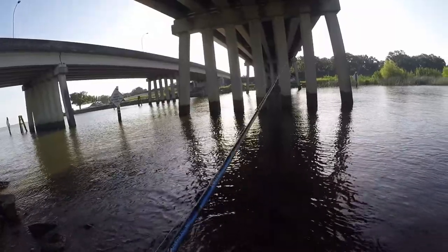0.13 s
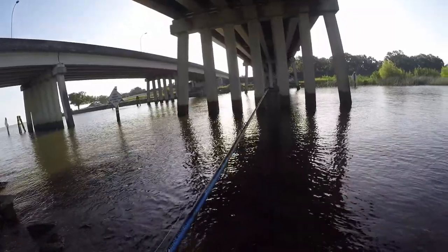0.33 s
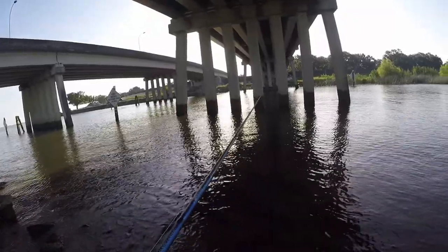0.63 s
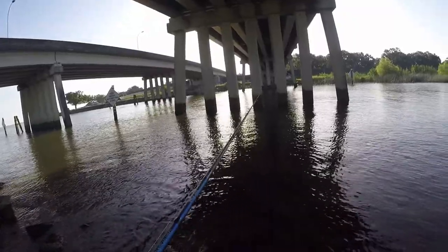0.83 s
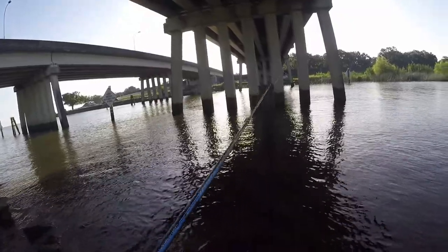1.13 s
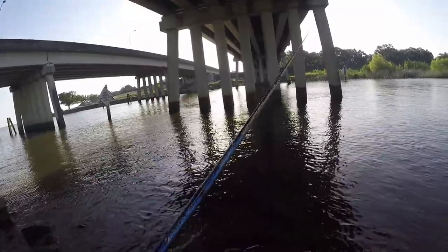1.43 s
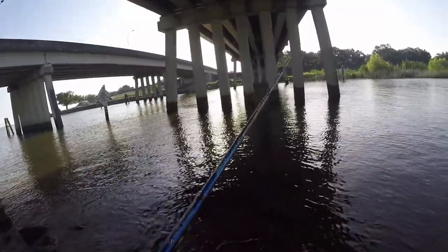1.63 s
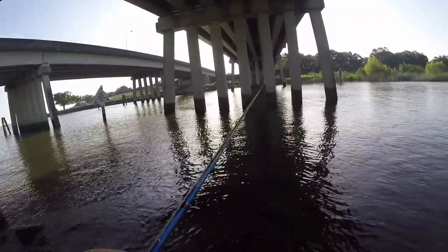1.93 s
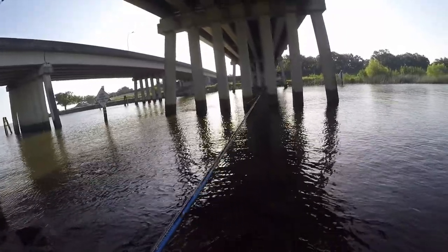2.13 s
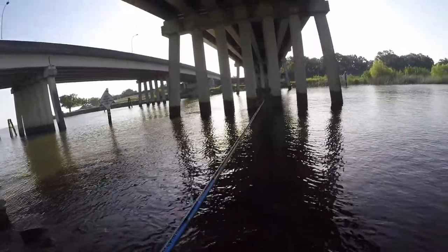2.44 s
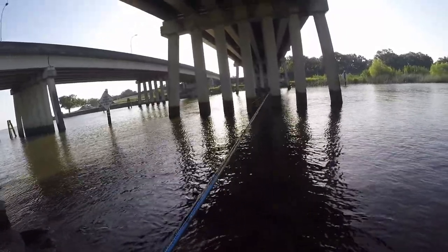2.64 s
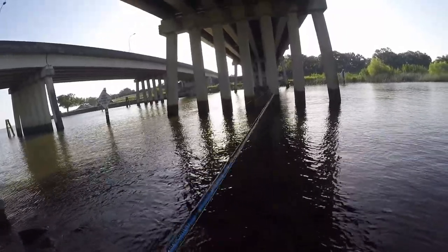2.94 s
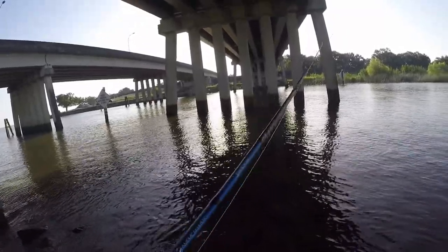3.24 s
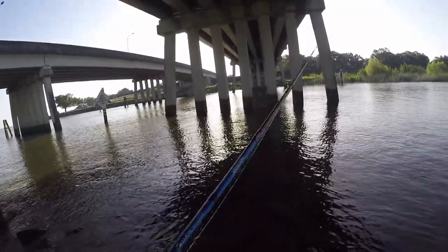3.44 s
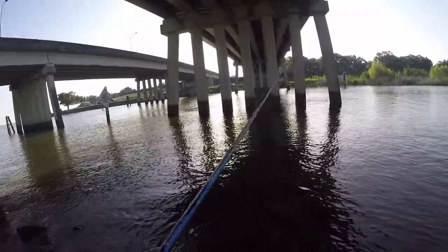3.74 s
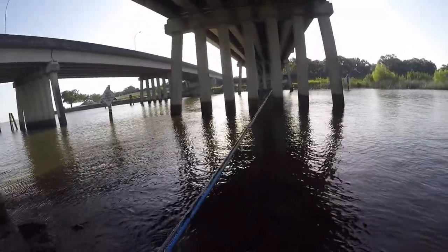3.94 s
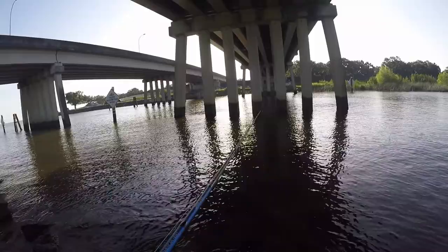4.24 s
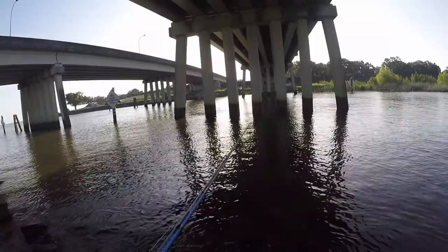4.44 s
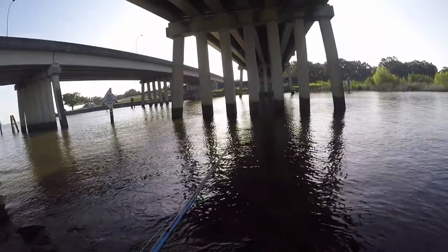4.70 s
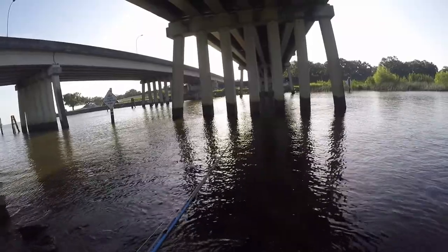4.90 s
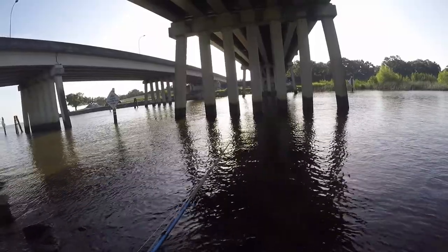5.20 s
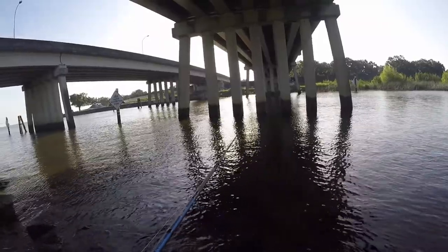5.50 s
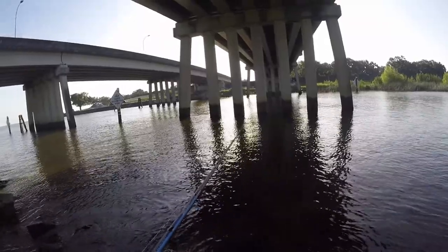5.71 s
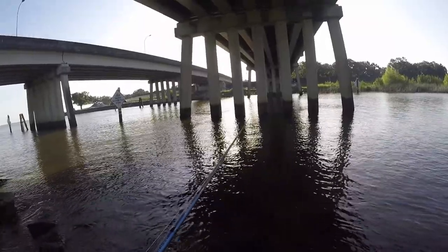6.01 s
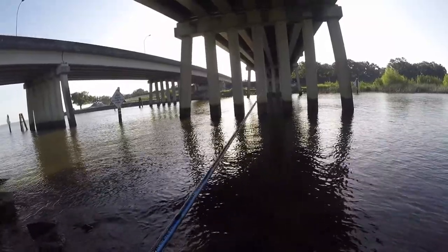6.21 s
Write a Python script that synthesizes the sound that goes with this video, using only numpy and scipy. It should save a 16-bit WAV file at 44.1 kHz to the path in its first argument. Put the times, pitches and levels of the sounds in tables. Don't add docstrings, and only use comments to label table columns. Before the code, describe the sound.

Under a concrete bridge, deep traffic rumble drones overhead while wind buffets the microphone and small drops plip and bubble at the water's edge.

```python
import sys
import numpy as np
from scipy import signal
from scipy.fft import rfft, irfft
from scipy.io import wavfile
from scipy.ndimage import uniform_filter1d

SR = 44100
rng = np.random.default_rng(int(sys.argv[2]) if len(sys.argv) > 2 else 0)


def to_wav(sig):
    pcm = np.clip(np.atleast_2d(sig), -1, 1) * 32767
    pcm = np.round(pcm).astype(np.int16)
    wavfile.write(sys.argv[1], SR, pcm.T)


def rack_gain(trim_db):
    fader = np.asarray(trim_db, float)
    return 10 ** (fader / 20)


N = 280476


def evened(x):
    return x / np.sqrt(np.mean(x ** 2) + 1e-20)


def smooth_noise(count, *sizes):
    x = rng.standard_normal(count)
    for size in sizes:
        x = uniform_filter1d(x, size=size)
    return evened(x)


def along(rows, t):
    s, *columns = np.transpose(rows)
    return [np.interp(t, s, c) for c in columns]


def across(rows, hz):
    f, *columns = np.transpose(rows)
    return [np.interp(np.log(hz + 1), np.log(f + 1), c) for c in columns]


def add(mix, s, sound):
    part = mix[:, round(s * SR):][:, :sound.shape[1]]
    part += sound[:, :part.shape[1]]


def colour(x, rows):
    gain_db = across(rows, np.fft.rfftfreq(N, 1 / SR))[0]
    return irfft(rfft(x) * rack_gain(gain_db), N)


def patchy(patch_db, flicker_db):
    frames = N // 128 + 5
    a, b, c, d, patches = rng.standard_normal((frames, 257, 5)).T
    patches = uniform_filter1d(patches, size=6, axis=0)
    patches = evened(uniform_filter1d(patches, size=24, axis=1))
    flicker = smooth_noise(frames, 8)
    z = np.array([a + 1j * b, c + 1j * d]) * rack_gain(patch_db * patches + flicker_db * flicker)
    return evened(signal.istft(z, nperseg=512, noverlap=384)[1][:, :N])


def ringing(modes):
    f = np.fft.rfftfreq(N, 1 / SR)
    power = np.zeros(len(f))
    for hz, width, db in modes:
        power += rack_gain(db) ** 2 / width / (1 + (2 * (f - hz) / width) ** 2) ** 2
    return irfft(rfft(rng.standard_normal((2, N))) * np.sqrt(power * 2 * SR / np.pi), N)


def drones(rows):
    out = np.zeros(N)
    for hz, db, wander_hz in rows:
        drift = smooth_noise(N, 9000, 9000)
        swell = smooth_noise(N, 9000, 9000)
        turns = np.cumsum(hz + wander_hz * drift) / SR
        out += rack_gain(db + 1.5 + 0.5 * swell) * np.sin(2 * np.pi * turns + 6.45 * rng.random())
    return out


def swells(t, times, rise, fall):
    u = t[::100] - np.array(times)[:, None]
    return np.where(u < 0, np.exp(-(u / rise) ** 2), np.exp(-abs(u) / fall))


def wind(t):
    # start in seconds, peak level in dB, left minus right in dB.
    gusts = [(0.03, -15.5, 12.5), (0.17, -15, 14), (0.41, -17, -8), (0.54, -17.5, -12), (0.67, -17.5, 11),
             (0.8, -11, 5.5), (1.03, -17.5, 17), (1.22, -20, 21), (1.33, -18.5, 16.5), (1.43, -24, 18),
             (1.66, -16.5, 7), (1.75, -20.5, 12), (2.05, -13, 8.5), (2.2, -36, 5), (2.55, -18, -2),
             (2.8, -29, 5), (3.17, -15, 10), (3.4, -23.5, 16.5), (3.65, -19.5, 10.5), (3.93, -23.5, 13),
             (4.12, -32, 11), (4.41, -26, 21), (4.8, -30.5, 12), (4.99, -18.5, 5), (5.17, -16.5, 8),
             (5.33, -20.5, 10), (5.77, -21.5, 8), (5.9, -29, 0), (6.05, -40, 11.5), (6.35, -35, 8)]
    # frequency in Hz, level in dB per Hz.
    gust_colour = [(5, -12), (12, 0.5), (22, -2), (45, -5), (75, -11.5), (120, -25.5), (200, -23.5),
                   (400, -55), (2000, -130)]
    lull_db = -30.5
    s, peak_db, lean_db = np.transpose(gusts)
    side_db = 2 * peak_db + np.array([lean_db, -lean_db])
    power = rack_gain(side_db) @ swells(t, s, rise=0.052, fall=0.069) + rack_gain(2 * lull_db)
    strength = np.array([np.interp(t, t[::100], np.sqrt(p)) for p in power])
    lumps = evened(colour(rng.standard_normal((2, N)), gust_colour))
    lumps[1] = 0.42 * lumps[0] + 0.95 * lumps[1]
    local = np.sqrt(uniform_filter1d(lumps ** 2, size=6000, axis=1)) + 0.32
    return lumps / local * strength * rack_gain(2.0)


def traffic(t):
    # time in seconds, load on the deck in dB.
    deck_load = [(0.0, -24.5), (0.44, -24), (1.01, -24.5), (1.88, -25), (2.73, -22.5), (3.65, -25.5),
                 (4.25, -25), (5.53, -23.5), (6.36, -23.5)]
    # frequency in Hz, level in dB per Hz.
    rumble_colour = [(30, -16.5), (60, -8), (100, 1.5), (145, -7), (200, -5.5), (290, -10.5), (335, -14),
                     (400, -14.5), (520, -25), (900, -62), (3000, -110)]
    # frequency in Hz, level in dB per Hz.
    roar_colour = [(240, -25.5), (420, -1), (600, -5.5), (800, -10.5), (1200, -13.5), (1600, -19.5),
                   (2100, -22), (2600, -21), (3600, -26.5), (6200, -31.5), (7800, -37.5), (10300, -32),
                   (11000, -52), (15000, -55)]
    # pitch in Hz, width in Hz, level in dB against the rumble.
    girders = [(79, 9.1, -12.5), (111.05, 6.1, -8), (121.7, 16.6, -9.5), (171.7, 18, -14.5),
               (205.6, 5.4, -15), (227.5, 11, -17), (279, 20, -15), (307.4, 62, -13), (356.8, 20, -14.5)]
    # pitch in Hz, level in dB against the rumble, wander in Hz.
    steady_engines = [(170.8, -6, 1.2), (106.5, -10, 2.5)]
    rumble_db = along(deck_load, t)[0]
    roar_db = -40.5 + 0.71 * np.maximum(t - 2.76, 0)
    deck = evened(colour(rng.standard_normal((2, N)), rumble_colour)) * rack_gain(-1.5)
    deck = deck + ringing(girders) + drones(steady_engines) + engines(t)
    roar = evened(colour(patchy(patch_db=1.13, flicker_db=1.0), roar_colour))
    own, other = rack_gain(rumble_db - 1.03) * deck + rack_gain(roar_db + 2) * roar
    return ports(own, other)


def engines(t):
    # time in seconds, third-order pitch in Hz, level in dB against the rumble.
    idling = [(0.0, 226.6, -12), (0.14, 225.5, -9.5), (0.3, 231.3, -8.5), (0.55, 229.3, -8.5),
              (2.16, 231.0, -7.5), (2.78, 227.2, -7.5), (2.87, 230.5, -10), (3.45, 229.5, -8),
              (3.88, 235.5, -8), (4.89, 234.6, -6.5), (5.01, 229.9, -8.5), (6.36, 230.3, -7.5)]
    # time in seconds, exhaust note in Hz, level in dB against the rumble.
    shifting = [
        (1.6, 299, -28),
        (2.3, 300, -13),
        (2.85, 299, -6.5),
        (3.15, 287.4, -8),
        (3.45, 272, -10.5),
        (3.7, 267, -10),
        (3.95, 277.6, -5.5),
        (4.25, 284, -9),
        (4.6, 294, -30),
    ]

    def tone(hz):
        return np.sin(2 * np.pi * (np.cumsum(hz) / SR + rng.random()))
    third_hz, idler_db = along(idling, t)
    note_hz, note_db = along(shifting, t)
    idler = tone(third_hz) + rack_gain(-0.44) * tone(third_hz * 4 / 3)
    return rack_gain(1.0) * (rack_gain(idler_db) * idler + rack_gain(note_db) * tone(note_hz))


def ports(own, other):
    # frequency in Hz, likeness from 0 to 1, left minus right in dB, left's lead in radians.
    port_pair = [(60, .62, 4.6, 0), (130, .92, 4, 0), (500, .97, 3.9, 0), (1100, .86, 3.4, 0),
                 (1600, .62, 3, 0), (2200, .3, 1.2, 0), (2700, .35, .2, .2), (3600, .2, -.1, 2),
                 (5700, .25, -2.5, 3.4), (7500, .22, -2.7, 5.3), (10000, .1, -4, 7), (14000, .15, -1, 9)]
    same, lean_db, lead = across(port_pair, np.fft.rfftfreq(N, 1 / SR))
    same = np.clip(same, 0, 1)
    left = rfft(own)
    right = same * left * np.exp(-1j * lead) + np.sqrt(1 - same ** 2) * rfft(other)
    return irfft(np.array([left * rack_gain(lean_db / 2), right * rack_gain(-lean_db / 2)]), N)


def whine(t):
    # time in seconds, level in dB.
    whine_level = [(0.0, -47), (0.78, -46.5), (1.35, -46), (1.75, -50), (2.09, -47), (3.12, -46),
                   (3.52, -53.5), (4.27, -58), (4.52, -49.5), (5.99, -48), (6.36, -53)]
    # pitch in Hz, level in dB.
    whine_tones = [(1026, -8), (1097, -1), (1125, -1.5), (1139, -0.5)]
    tones = drones([(hz, db, 1.2) for hz, db in whine_tones])
    return rack_gain(along(whine_level, t)[0] - 5.0) * tones * rack_gain(np.array([[1.6], [-1.6]]))


def insects(t):
    # time in seconds, level of the high insects in dB.
    chorus_level = [(0.0, -54.5), (0.05, -57.5), (2.71, -56.5), (2.8, -54.5), (3.68, -59), (3.79, -57),
                    (6.22, -59), (6.32, -58), (6.36, -60)]
    # pitch in Hz, width in Hz, level in dB.
    high_wings = [(9795, 390, 0), (9510, 60, -10), (9270, 550, -3), (10400, 490, -13.5)]
    high = singer(t, 69.3, 0.16, high_wings, arch_hz=330.)
    low = singer(t, 56., 0.44, [(6860, 250, 0)], arch_hz=60.)
    high_db = along(chorus_level, t)[0] + np.array([[-2.5], [4.5]])
    return high * rack_gain(high_db) + low * rack_gain(np.array([[-69.], [-66.]]))


def singer(t, strokes_hz, depth, wings, arch_hz):
    beat = 2 * np.pi * strokes_hz * t + 1.5 * smooth_noise(N, 20000, 8000)
    ring = ringing(wings)
    ring[0] += 0.27 * ring[1]
    flutter = smooth_noise(N, 150)
    pitch = wings[0][0] + arch_hz * (np.cos(beat) - 1) + 60. * flutter
    stroke = 0.6 * (1 + np.cos(beat)) * np.sin(2 * np.pi * np.cumsum(pitch) / SR)
    hiss = ring / ring.std(axis=1, keepdims=True) * (1 + depth * np.cos(beat))
    return rack_gain(-0.5) * (hiss + stroke)


def trickle(t):
    # time in seconds, level of the fine trickle in dB.
    trickle_level = [(0.0, -57.5), (0.83, -57.5), (1.43, -57.5), (1.66, -58.5), (2.96, -59.5),
                     (3.31, -59.5), (4.39, -56.5), (4.53, -56), (5.95, -55.5), (6.24, -56.5), (6.36, -54)]
    level_db = along(trickle_level, t)[0]
    busy_db = level_db - level_db.mean()
    pops_now = rng.random(N) < 800. / SR * rack_gain(1.5 * busy_db)
    size = rack_gain(2.0 * np.minimum(rng.exponential(1, N), 3.5)) * pops_now
    kind = rng.integers(0, 16, N)
    side = rng.random(N) < .5
    out = np.zeros((2, N))
    for k, hz in enumerate(np.geomspace(900., 8000., num=16)):
        u = np.arange(400) / SR * hz
        fade = np.exp(-u / 2.3) * np.minimum(u, 1)
        grain = np.sin(2 * np.pi * u * (1 + 0.018 * u)) * fade * (hz / 3000) ** -.95
        hits = size * (kind == k) * np.array([side, ~side])
        out += signal.oaconvolve(hits, grain[None], axes=1)[:, :N]
    return evened(out + 0.39 * out[::-1]) * rack_gain(level_db + 1.5 * busy_db + 3.0)


def spray(t):
    # frequency in Hz, level in dB per Hz.
    spray_colour = [(3000, -33), (7000, -10), (10500, 0), (13000, -3), (15000, -8.5), (17000, -20)]
    mist_db = -92
    strength = np.sqrt(splash_power(t) + rack_gain(2 * mist_db))
    return strength * rack_gain(8.0) * evened(colour(patchy(patch_db=3.5, flicker_db=2.0), spray_colour))


def splash_power(t):
    # time in seconds, peak level in dB.
    splashes = [(0.1, -79), (0.41, -83), (0.55, -80), (0.92, -70.5), (0.96, -75.5), (1.7, -79),
                (2.2, -83.5), (2.55, -84), (3.1, -76), (3.45, -73.5), (3.63, -70.5), (3.72, -72.5),
                (3.98, -71.5), (4.32, -70), (4.45, -74), (4.64, -69.5), (4.75, -75), (4.86, -70),
                (5.06, -71), (5.15, -70.5), (5.3, -77), (5.51, -67.5), (5.6, -69), (5.7, -67.5),
                (5.87, -67.5), (5.95, -74.5), (6.04, -65.5), (6.15, -78.5), (6.28, -69)]
    s, peak_db = np.transpose(splashes)
    return np.interp(t, t[::100], rack_gain(2 * peak_db) @ swells(t, s, rise=.012, fall=.035))


def lapping(t):
    # start in seconds, peak in dB, ring in Hz, width in Hz.
    spits = [(0.403, -19, 6300, 1500), (0.6771, -29, 7260, 2020), (0.916, -30, 8000, 600),
             (0.9231, -22, 4840, 1000), (0.955, -20.5, 5640, 900), (0.9545, -24, 4300, 900),
             (0.9555, -24, 7800, 1500), (0.9759, -33, 4510, 1030), (3.458, -33, 7600, 390),
             (3.7138, -29.5, 8100, 840), (3.977, -30, 4800, 800), (4.3205, -18, 6750, 3980),
             (4.3385, -19, 6050, 2500), (4.3772, -33, 4920, 1120), (4.4327, -33, 5070, 550),
             (4.4692, -34, 5550, 1400), (4.7228, -33.5, 4580, 380), (4.8431, -26, 7510, 1590),
             (5.1457, -33, 7100, 1500), (5.1489, -31, 4430, 940), (5.3258, -35, 5480, 710),
             (5.495, -23.5, 4440, 500), (5.4955, -21, 6030, 2500), (5.6681, -30, 6030, 2460),
             (5.684, -28, 4320, 610), (5.8658, -25, 5130, 1800), (6.0305, -28, 8500, 1000),
             (6.0505, -27, 7200, 1680), (6.1389, -33, 4910, 1730), (6.2604, -30, 5770, 900),
             (5.523, -36, 5600, 2500), (5.531, -34, 5250, 500), (5.567, -33, 4100, 700),
             (5.601, -33, 6400, 900), (5.629, -31, 7200, 2000), (5.704, -36, 8300, 1200),
             (5.721, -37, 7800, 1500), (5.732, -38, 6300, 800), (5.879, -37, 8000, 900),
             (6.031, -33, 6000, 800), (6.096, -36, 4300, 1800), (6.274, -36, 5800, 900),
             (6.302, -36, 4100, 500), (5.931, -39, 5160, 500), (0.581, -40, 7200, 1200),
             (0.9275, -30, 6200, 900), (0.983, -40, 5000, 600), (3.828, -40, 5600, 900),
             (4.375, -31, 3500, 1500), (0.4035, -33, 4500, 700)]
    # start in seconds, peak in dB, ring in Hz, width in Hz.
    plips = [(0.123, -26, 700, 440), (0.2493, -30, 1710, 600), (0.581, -26, 3600, 700),
             (0.9155, -18, 1150, 600), (0.9238, -27, 1700, 700), (0.955, -23, 1500, 900),
             (0.956, -28, 2900, 1200), (0.97, -23, 1000, 500), (0.991, -29, 2160, 600),
             (1.023, -31, 2600, 500), (2.9485, -25.5, 1700, 900), (2.9835, -29, 2300, 700),
             (3.08, -26, 1450, 400), (3.6, -33, 2600, 500), (3.718, -25, 1700, 600),
             (3.806, -29, 2600, 300), (4.33, -34, 3840, 870), (4.337, -25, 2400, 960),
             (4.377, -22, 1200, 720), (4.4015, -20, 1000, 500), (4.612, -23, 1230, 240),
             (4.7, -34, 2200, 600), (5.363, -32, 2450, 500), (5.526, -32, 813, 300),
             (5.553, -28, 1940, 500), (5.5656, -28, 2000, 1500), (5.569, -28, 2600, 580),
             (5.612, -33, 2600, 500), (5.663, -26, 1610, 500), (5.704, -23, 2500, 1300),
             (5.7056, -22, 1300, 1300), (5.75, -30, 2560, 400), (5.772, -33, 3200, 500),
             (5.8655, -24, 3070, 450), (5.905, -28, 670, 300), (5.949, -26, 960, 300),
             (5.964, -30, 2400, 900), (6.067, -26, 3740, 460), (6.11, -27, 2370, 200),
             (6.15, -28, 783, 270), (6.16, -30.5, 2480, 350), (6.175, -26, 3160, 490),
             (6.245, -29, 1470, 400), (6.2599, -23, 2200, 1200), (6.3, -22, 3060, 900),
             (6.3, -19, 2020, 650), (6.345, -26, 1600, 500)]
    # start in seconds, peak in dB, ring in Hz,
    # width in Hz.
    more_plips = [(0.581, -32, 4600, 900), (1.684, -28, 800, 500), (2.949, -28, 2600, 1200),
                  (3.014, -27, 650, 400), (3.634, -34, 6500, 2500), (3.722, -28, 1900, 500),
                  (3.812, -29, 2400, 200), (4.3205, -27, 9200, 1500), (4.322, -29, 3250, 570),
                  (4.329, -29, 1800, 500), (4.392, -27, 1100, 600), (4.418, -30, 1750, 300),
                  (4.449, -38, 6300, 1200), (4.47, -32, 2600, 400), (4.473, -34, 4200, 500),
                  (4.566, -34, 3300, 500), (4.577, -37, 4800, 760), (4.633, -35, 7500, 1600),
                  (4.684, -31, 3100, 600), (5.327, -35, 6500, 1000), (5.5, -28, 1750, 800),
                  (5.523, -35, 3800, 1200), (5.565, -31, 4200, 700), (5.58, -33, 3000, 1500),
                  (5.592, -28, 830, 300), (5.657, -35, 4000, 1200), (5.716, -30, 2800, 900),
                  (5.732, -31, 2400, 900), (5.837, -37, 5000, 900), (5.866, -35, 7200, 1200),
                  (5.9, -36, 6500, 2500), (5.99, -34, 2000, 600), (6.031, -30, 2000, 1200),
                  (6.045, -34, 2700, 600), (6.073, -36, 7000, 2500), (6.097, -33, 3200, 1500),
                  (6.139, -34, 7500, 2000), (6.225, -33, 2200, 600), (6.26, -32, 3600, 1200),
                  (6.32, -37, 7500, 1800)]
    # start in seconds, peak in dB, ring in Hz, width in Hz.
    sloshes = [(0.925, -29, 1500, 900), (0.962, -31, 2300, 1600), (1.02, -33, 2500, 1400),
               (1.505, -35, 2300, 600), (1.54, -33, 2580, 1000), (2.99, -37, 2700, 700),
               (4.03, -35, 2500, 600), (4.325, -32, 2770, 1600), (4.375, -28, 1100, 900),
               (4.4, -28, 1300, 1200), (5.5, -37, 1800, 1200), (5.56, -29.5, 2300, 1500),
               (5.65, -32, 2190, 1200), (5.708, -28.5, 2580, 1200), (5.745, -38, 2600, 500),
               (5.93, -54, 2800, 1000), (6.06, -41, 2400, 1500), (6.2, -39, 2300, 1200),
               (6.27, -41, 6300, 1500)]
    # start in seconds, peak in dB, first pitch in Hz, fade by 60 dB in seconds, rise in octaves a second.
    bubbles = [(.281, -26, 970, 0.027, -6), (3.055, -27.5, 667, 0.064, 37), (3.856, -22.5, 1475, 0.025, -5),
               (4.874, -21.5, 492, 0.053, -6), (5.611, -26, 1316, 0.024, 31), (5.668, -21, 2540, 0.019, -9),
               (5.683, -28, 2180, 0.022, 15), (5.704, -13, 727, 0.021, 8), (5.919, -26.5, 1350, 0.028, 6),
               (6.006, -27, 920, 0.033, 1), (6.075, -28, 1140, .02, 3), (6.091, -22.5, 1310, 0.014, 5),
               (5.566, -24, 1150, 0.014, 4), (4.402, -18.5, 704, 0.012, 3), (6.03, -23, 1200, 0.061, 2),
               (6.188, -23.5, 600, 0.1, 18), (1.718, -26, 1050, 0.011, 2), (6.24, -25.5, 940, 0.036, 13.5)]
    out = gurgle(t)
    kinds = (spits, 0.0048, 0.98), (plips, 0.0037, 0.98), (more_plips, 0.0037, 0.98), (sloshes, 0.057, .3)
    for rows, t60, push in kinds:
        for s, *row in rows:
            add(out, s, tick(*row, t60, push))
    for s, *row in bubbles:
        add(out, s, bubble(*row))
    u = np.arange(6000) / SR
    echoes = rng.standard_normal((2, 6000)) * (rng.random((2, 6000)) < .2)
    echoes = echoes * rack_gain(-60 * u / 0.17) * (u > .003)
    return out + rack_gain(-15) * signal.oaconvolve(out, echoes / np.linalg.norm(echoes[0]), axes=1)[:, :N]


def gurgle(t):
    crowd = uniform_filter1d(splash_power(t), size=3000) / rack_gain(2 * -72.)
    rate = 120. * np.minimum(crowd, 1.5)
    starts = np.flatnonzero(rng.random(N) < rate / SR)
    out = np.zeros((2, N))
    for at, (loud, pitch, rise) in zip(starts, rng.random((len(starts), 3))):
        hz = 693.0 * 2 ** (2.6 * pitch)
        peak_db = -38. + 4.0 * loud - 3.7 * np.log2(hz / 1000)
        add(out, at / SR, bubble(peak_db, hz, 12. / hz, 22.0 * rise))
    return out


def bubble(peak_db, hz, t60, rise):
    u = np.arange(0, t60, 1 / SR)
    turns = np.cumsum(hz * 2 ** (rise * u)) / SR
    fade = rack_gain(-60 * (u / t60) ** 1.68) * np.minimum(u / 0.0018, 1)
    return rack_gain(peak_db - 3.0 + np.array([[1.7], [-1.7]])) * fade * np.sin(2 * np.pi * turns)


def tick(peak_db, hz, width, t60, push):
    noise = rng.standard_normal((3, 5000))
    u = np.arange(5000) / SR
    lean_db = 7.5 - 4 * np.log2(hz / 1000)
    spit = (noise[0] + 1.3 * noise[1:]) * rack_gain(-60 * u / (2.65 * t60)) * np.minimum(u / 0.0016, 1)
    strike = push * (np.arange(len(u)) == 40) + 0.2 * spit
    ring = resonate(resonate(strike, hz, 1.12 * width), hz, 5.1 * width)
    return rack_gain(peak_db - 4.0 + np.array([[lean_db], [-lean_db]]) / 2) * ring / abs(ring).max()


def resonate(x, hz, width):
    turn = np.exp(2j * np.pi * hz * np.arange(x.shape[-1]) / SR)
    r = np.exp(-np.pi * width / SR)
    smooth = signal.lfilter([(1 - r) ** 2], [1, -2 * r, r * r], x / turn)
    return 2 * (turn * smooth).real


def from_left(x):
    return np.array([x[0], np.roll(x[1], shift=3)])


def scene():
    t = np.arange(N) / SR
    water = trickle(t) + spray(t) + lapping(t)
    return wind(t) + traffic(t) + whine(t) + insects(t) + from_left(water)


def low_pass(x):
    return signal.sosfilt(signal.butter(12, 15060, fs=SR, output="sos"), x)


def record(dry):
    ends = signal.windows.tukey(N, .0012)
    return low_pass(np.clip(dry, -1, 1) * ends)


dry = scene()
out = record(dry)
to_wav(out)
```